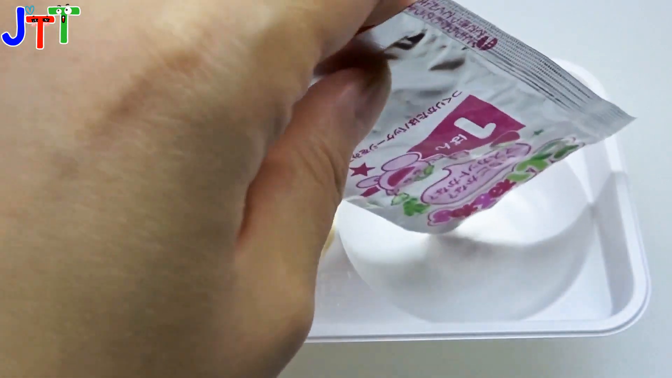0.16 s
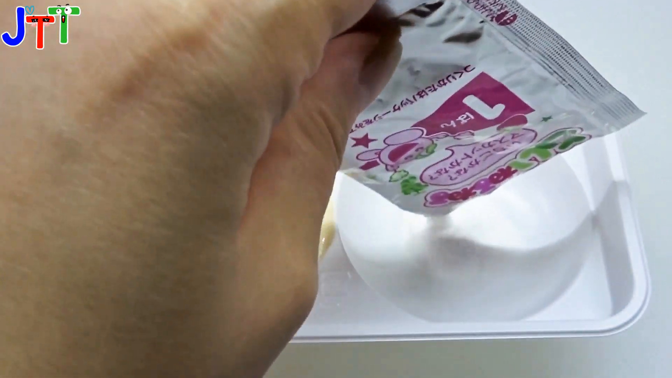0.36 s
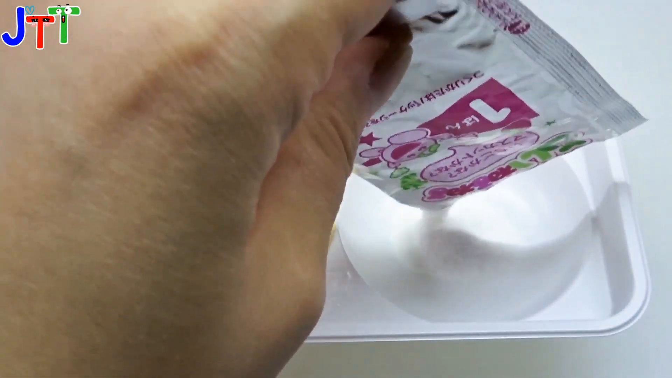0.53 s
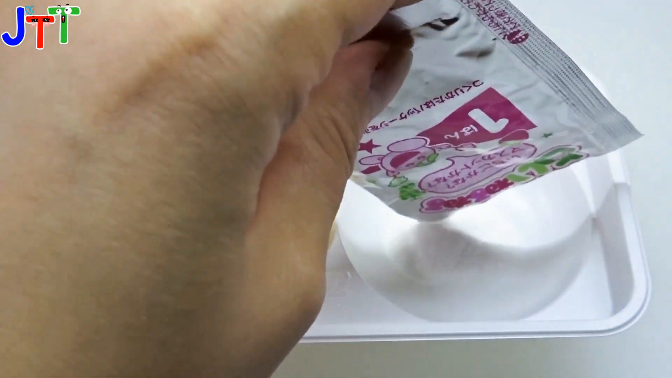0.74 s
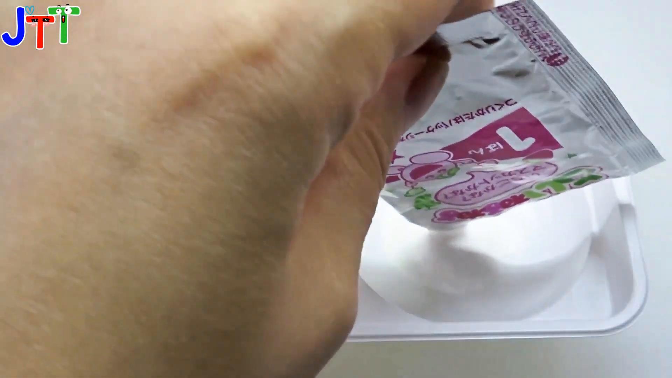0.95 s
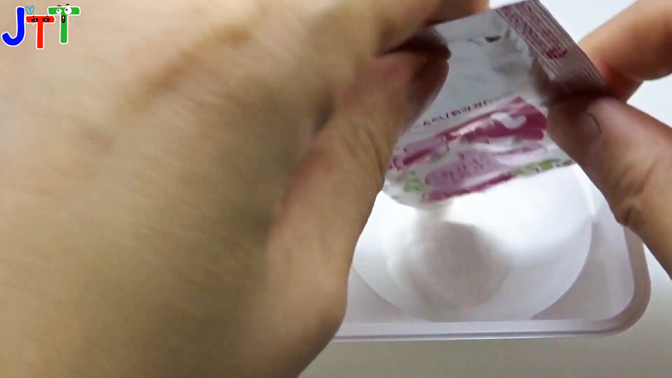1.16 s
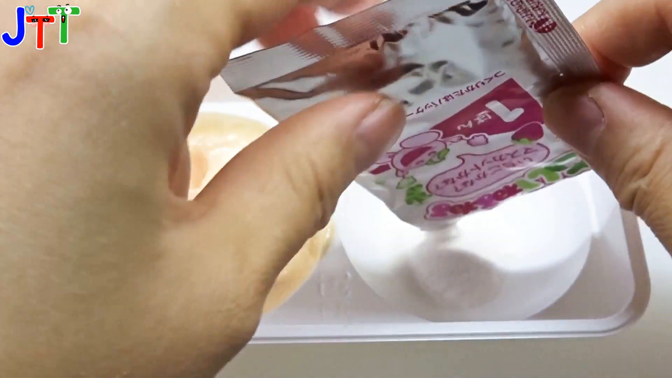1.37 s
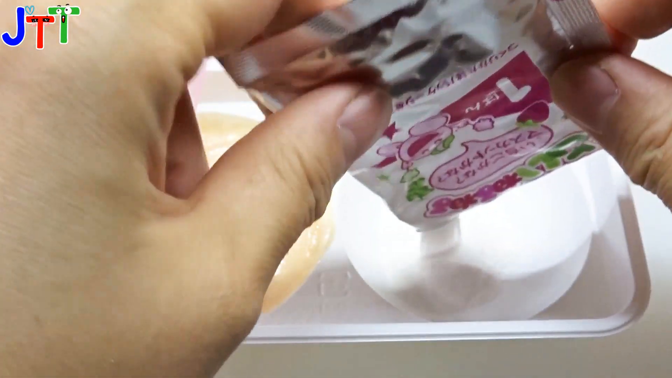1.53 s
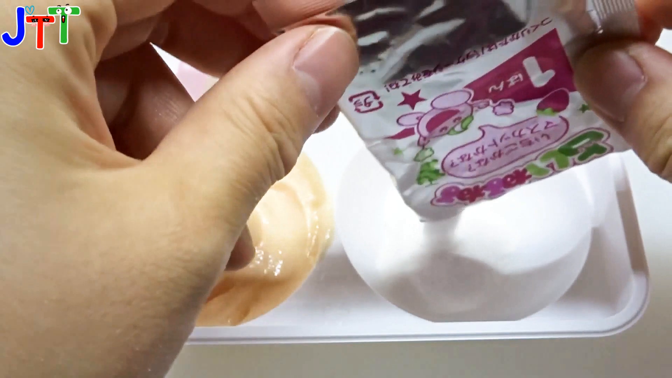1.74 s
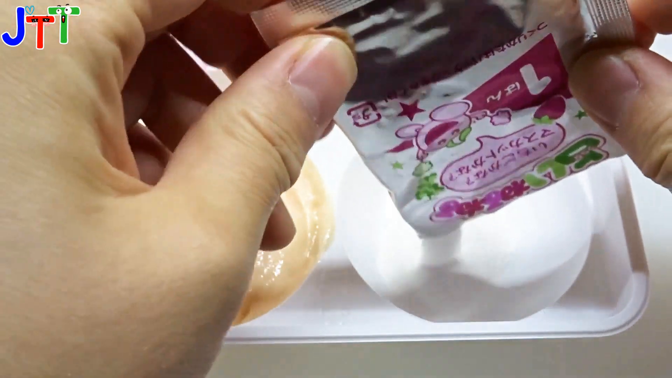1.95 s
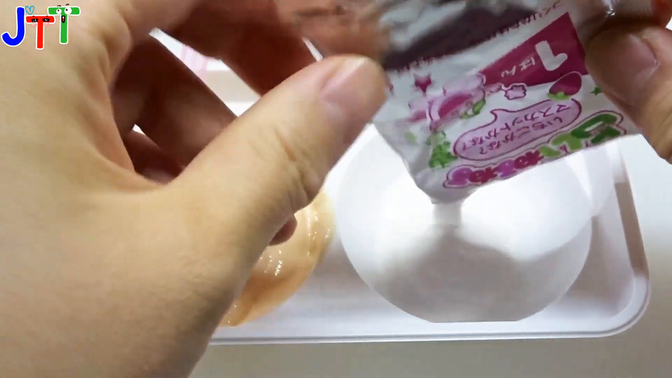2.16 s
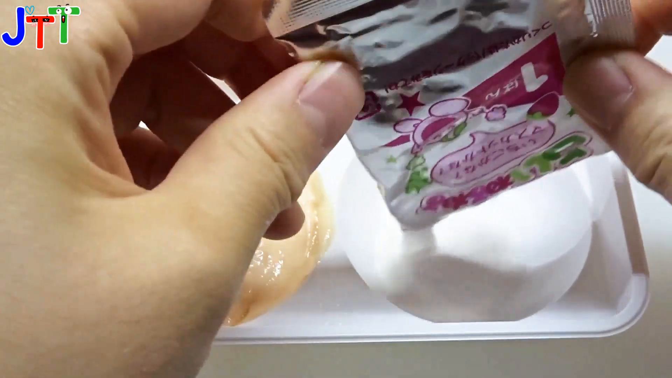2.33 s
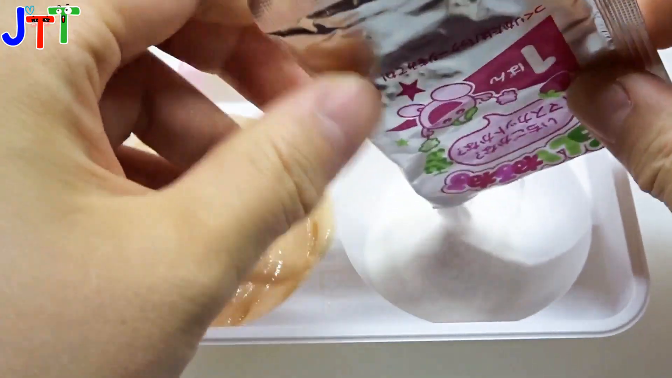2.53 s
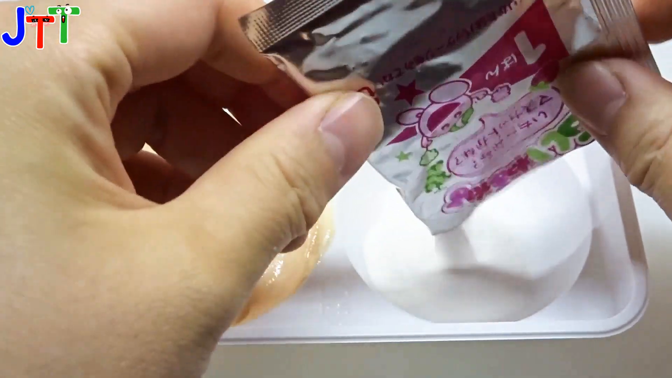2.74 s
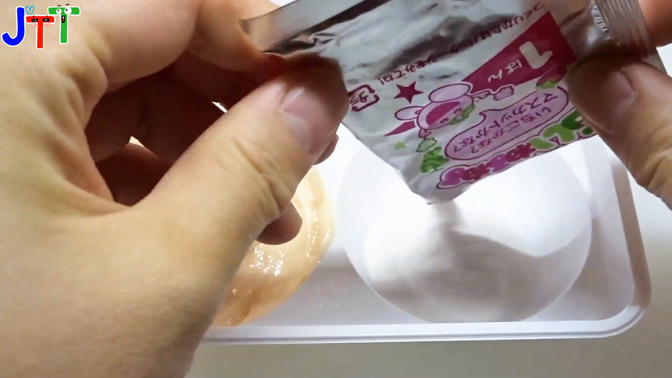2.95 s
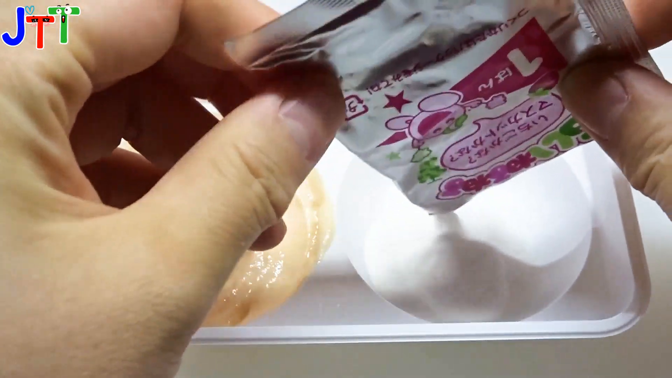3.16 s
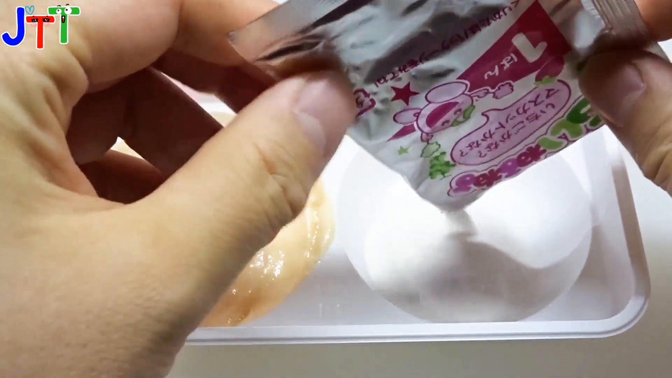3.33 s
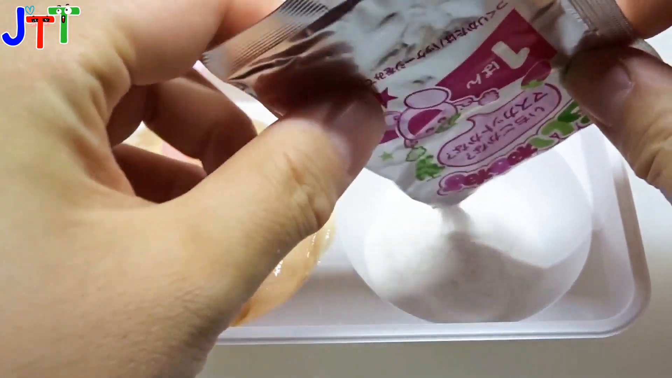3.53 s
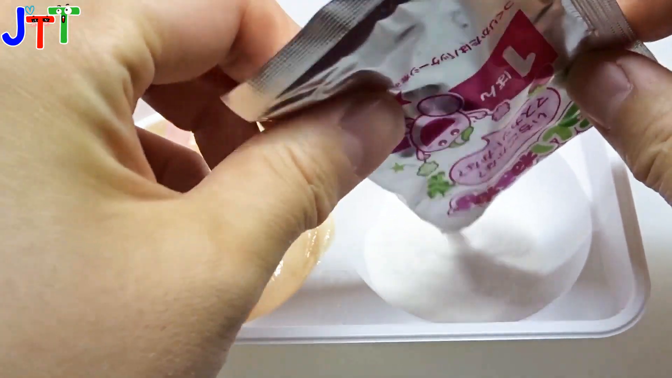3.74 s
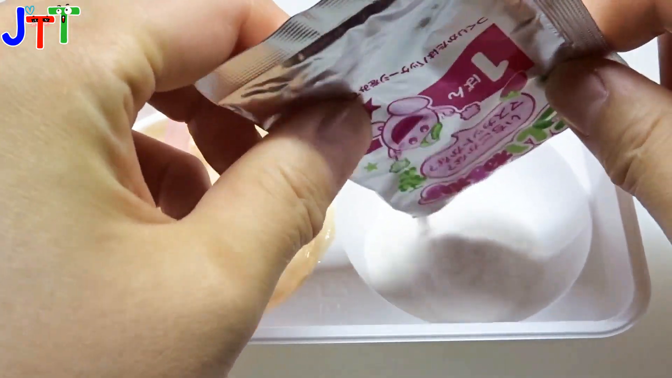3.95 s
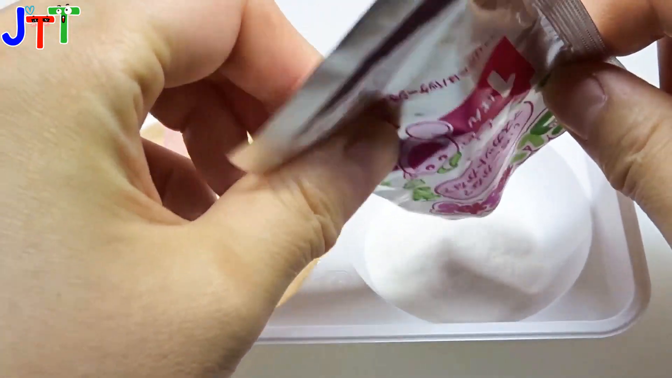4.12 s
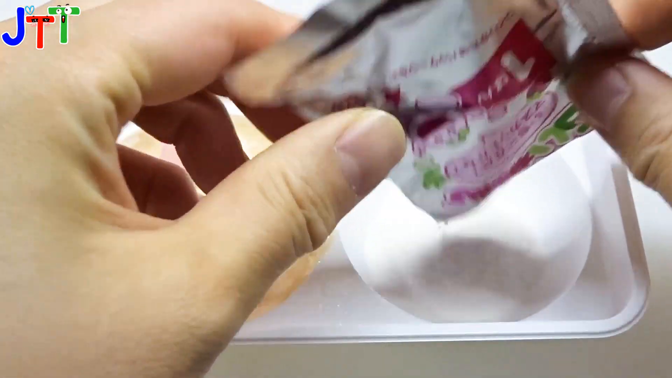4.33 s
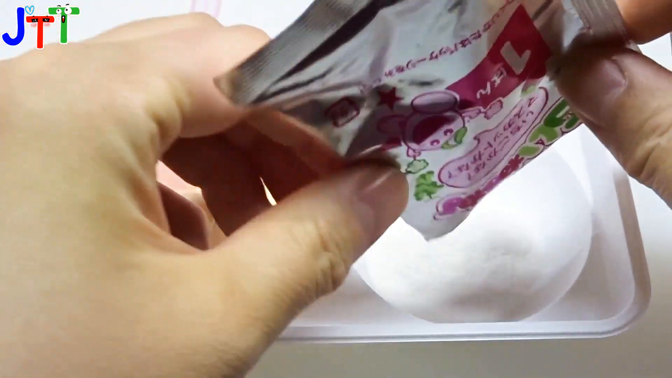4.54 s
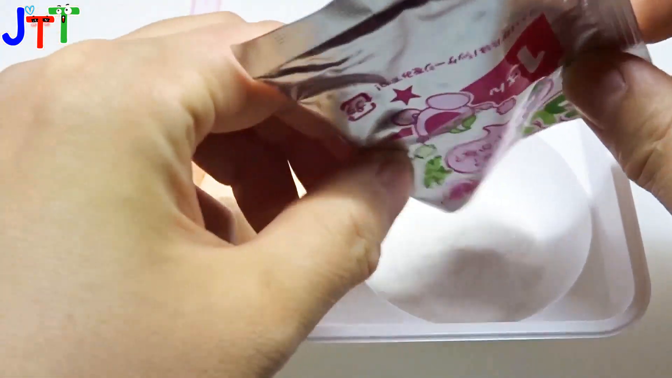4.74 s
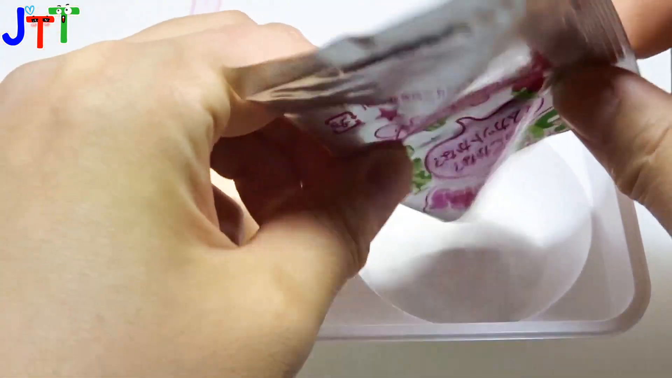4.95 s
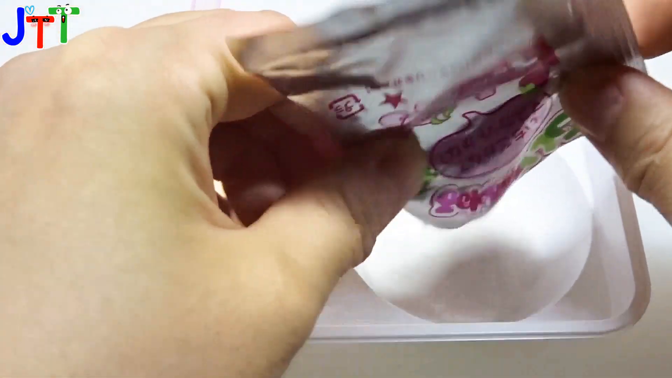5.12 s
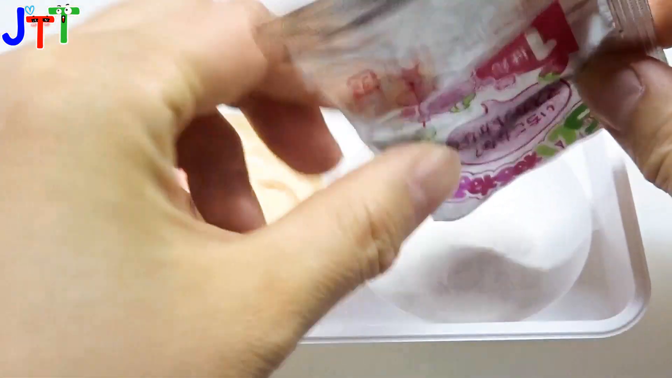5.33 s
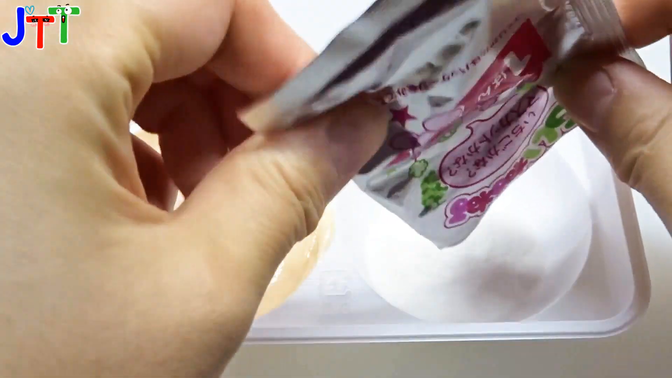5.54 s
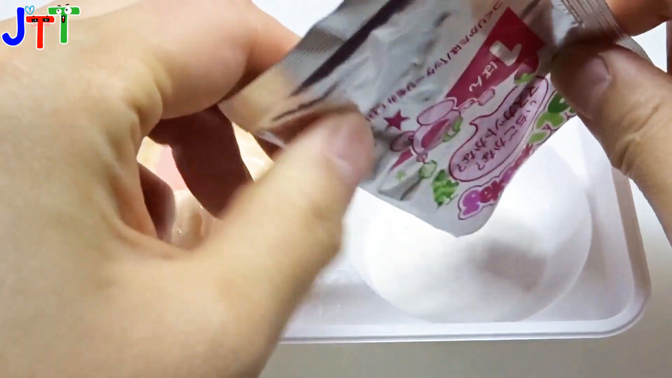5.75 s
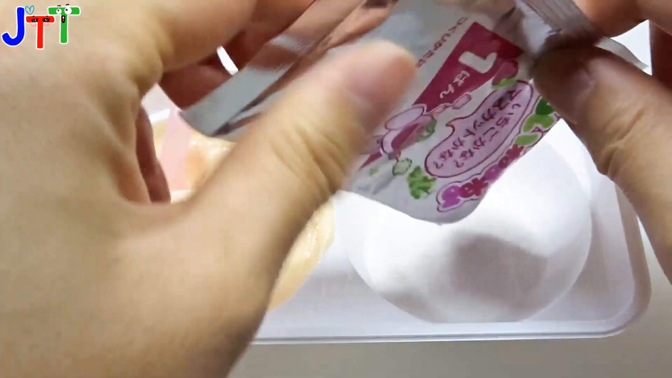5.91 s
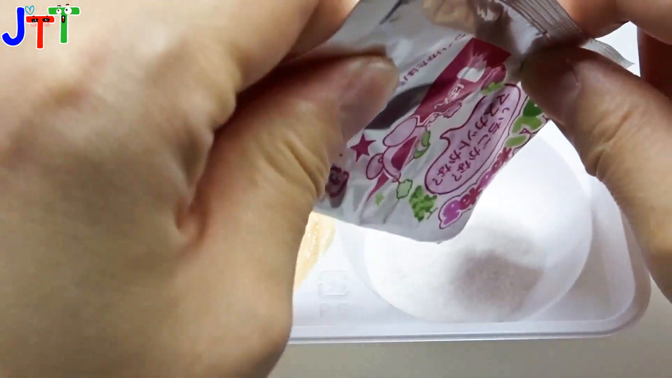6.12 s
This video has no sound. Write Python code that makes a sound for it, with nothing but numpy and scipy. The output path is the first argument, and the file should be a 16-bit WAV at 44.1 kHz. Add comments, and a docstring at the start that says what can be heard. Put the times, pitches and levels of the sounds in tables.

```python
"""Under the whole scene an appliance hums low, with soft air noise, in a quiet room that answers faintly.
First powder slides along a foil packet close to the microphone, a grain-scrape hiss with a fingertip's swish.
A faint tap rings a plastic tray; then fingers squeeze the packet and shake it, and creases buckle in sharp
snaps: noise bursts with short rings, over fine random crackle. Wall panels pop and the pouch resonates.
The snaps crowd together in the later part, while the powder thins out."""
import sys
import numpy as np
from scipy import signal
from scipy.fft import rfft, irfft
from scipy.io import wavfile

SR = 44100
rng = np.random.default_rng(int(sys.argv[2]) if len(sys.argv) > 2 else 0)


def to_wav(sig):
    """Store sig (one row per channel, or 1-D mono) as 16-bit WAV at the path in sys.argv[1].

    Samples outside -1..1 are clipped; the rate is SR.
    """
    pcm = np.clip(np.atleast_2d(sig), -1, 1) * 32767
    pcm = np.round(pcm).astype(np.int16)
    wavfile.write(sys.argv[1], SR, pcm.T)  # frames by channels


N = 276948

# Source levels below are those before the balance gains, the resonators and the microphone.
# clear snaps of buckling creases: (time [s], level [dB], push on the wall relative to the level [dB],
# treble relative to middle band before the treble lift [dB], ring of the facet [Hz])
CREASE_SNAPS = [(0.27, -59.5, 2.5, 0, 4900), (1.061, -38.5, -21, 9.5, 4430), (1.339, -40, -1, 9, 5800),
                (1.3657, -41, -7, -8.0, 3950), (1.3813, -27.5, -18, 6, 3300), (1.389, -36.5, -8, -1, 3980),
                (1.403, -36.5, -22, 8, 4050), (1.892, -38.5, -17, -8, 5700), (1.979, -52.5, -10, -15, 2780),
                (2.102, -44.5, -12, -8, 5500), (2.1671, -35.5, -11.5, -5, 5640),
                (2.192, -38.5, -8, -25, 4100), (2.222, -42, -16, -1, 4200), (2.276, -44, -10, -5, 4140),
                (2.289, -39.5, -11.5, 1, 5430), (2.333, -45, -10, -5, 5200), (2.3903, -46, -6.5, -2, 5100),
                (2.5353, -38, -6, 2, 4030), (2.572, -45, -1, 4, 2700), (2.6277, -37, -0.5, 2, 3200),
                (2.636, -30, -25, 7.5, 5070), (2.65, -38.5, -16, -7, 5400), (2.6884, -45, -1.5, -6, 5360),
                (2.8376, -36, -9, 1, 5250), (2.849, -43, -2, 27, 6500), (2.909, -45.5, -13, 2, 7000),
                (2.9619, -30, -7, 1, 5240), (3.027, -38, -18, -5, 3100), (3.1993, -48, -20, -8, 4020),
                (3.2469, -39, -29, -1, 5550), (3.2638, -40, -2.5, 1, 6040), (3.342, -42.5, -10, 1, 8500),
                (3.35, -49, -9, 2, 5500), (3.398, -39.5, -8.5, 5, 5400), (3.459, -50, -20, -1, 6300),
                (3.5641, -43, -2.5, -4, 7450), (3.583, -36, -6, 0, 2750), (3.5908, -38.5, -7, 2, 4260),
                (3.613, -39, -2, 4, 3260), (3.6274, -42, -16, 6, 2800), (3.7578, -34.5, -5.5, 11, 6100),
                (3.769, -29.5, -10, -1, 6100), (3.7731, -26, -14, 11, 9700), (3.8153, -41.5, -21, -3, 6800),
                (3.849, -33, -4, 6, 4070), (3.8553, -43, -7, -5, 7350), (3.8842, -35, -11, 7, 6940),
                (3.8922, -26, -16.5, -0.5, 7700), (3.9193, -24.5, -18.5, 15, 6600),
                (3.9453, -41, -26, -9, 5100), (3.9807, -25, -38, -2, 6700), (4.0014, -35.5, -1, -13, 6900),
                (4.008, -29, -3.5, 1, 6600), (4.077, -43, 0.5, -2, 4900), (4.1042, -36, -6.5, 10, 4600),
                (4.118, -35.5, -10, 1, 5300), (4.1307, -39.5, -5, -23, 2860),
                (4.1847, -32.5, -3.5, -4, 5700), (4.1933, -32.5, -5, 0, 7800), (4.2035, -31.5, -5, 6, 5900),
                (4.2288, -35, -11, -10, 3180), (4.2459, -29.5, -21, 8, 6200), (4.267, -27.5, -11, 5, 6100),
                (4.273, -32.5, -3, 6, 5100), (4.292, -37.5, -6, -1, 6000), (4.3073, -36, -11, 8, 4740),
                (4.3212, -30.5, -14, -4, 5200), (4.329, -35, -21, 8, 5220), (4.3365, -26.5, -8, 3, 5160),
                (4.3558, -33, -5.5, -2.0, 5100), (4.3987, -33.5, -17, -9, 3650),
                (4.4158, -39, -8, -7, 3880), (4.4369, -28, -10, -2, 6460), (4.445, -28, -22, -14, 3880),
                (4.4484, -25.5, -11.5, -4, 5170), (4.468, -27, -6, -2, 3530), (4.5103, -33, -11, 9, 5960),
                (4.518, -30.5, -11.5, 4, 3600), (4.531, -33.5, -9, -8, 4090), (4.542, -27, -10, 19, 5900),
                (4.549, -35, -3.5, -14, 2980), (4.567, -36, -4.5, -8, 5320), (4.5755, -33, -11, 0.5, 6360),
                (4.661, -43.5, -7, -1, 3160), (4.757, -47.5, -15, -6, 5530),
                (4.7755, -28.5, -10.5, 5, 8200), (4.784, -35.5, -18, 2, 5500), (4.79, -27, -14.5, 11, 7400),
                (4.8222, -35, -8, -18, 5200), (4.84, -21.5, -14.5, 2, 4860), (4.8879, -30.5, -11, 14, 4740),
                (4.903, -29.5, -14.5, 2, 7500), (4.914, -35, -9.5, 16, 7500), (4.9203, -35, -13, -9, 6100),
                (4.936, -45, -12, -7, 5500), (4.949, -49, -14, -6, 4000), (4.976, -38, -30, 1, 6300),
                (5.009, -45.5, -12, 1, 6000), (5.019, -35.5, -7.5, -3, 3900),
                (5.1155, -37.5, -9.5, 10, 8400), (5.146, -27.5, -8, 2, 6700),
                (5.156, -33.5, -8, -9.0, 6300), (5.164, -38, -10, -6, 4500),
                (5.1763, -23.5, -3.5, -4, 4900), (5.196, -31, -7.5, -2, 4750), (5.349, -32, 0, -9, 5100),
                (5.3604, -23, -16, 7, 5080), (5.3661, -21.5, -14.5, 10, 5100),
                (5.4868, -37, -6.5, -5, 2300), (5.5121, -26.5, -16, 11, 7700),
                (5.5265, -31.5, -26, 18, 7800), (5.5362, -33, -14, 12, 5200), (5.5413, -33, -13, 13, 6400),
                (5.554, -37, -2.5, -4, 2380), (5.6371, -23.5, -13, 5.5, 5760),
                (5.6786, -30.5, -10, 13, 7260), (5.6944, -37.5, -4, 2, 4400), (5.7234, -36, -1, -18, 2260),
                (5.731, -31.5, -4, 12, 5300), (5.7444, -45, -5, -2, 6350), (5.7682, -29.5, -24, -6, 6950),
                (5.8414, -29.5, -10, -13, 5470), (5.8537, -35.5, -7, -25, 3550), (5.871, -34, -7, -7, 5440),
                (5.9132, -24.5, -23, 0.5, 4000), (5.9263, -33.5, -11, 4, 5630),
                (5.959, -34, -10.5, 1, 5230), (5.986, -43.5, 3.5, 5, 2200), (6.1488, -29, -27, 9, 5530),
                (6.1567, -28, -21, 1.5, 5450), (6.1737, -36, -12, -3, 5600), (6.191, -37.5, -5.5, 0, 6630),
                (6.202, -46.5, -3, 1.5, 6000), (6.222, -29.5, -9, -3, 2200), (6.233, -26, -15, 8, 2120),
                (6.2597, -31, -16, 5, 6000), (6.2692, -27.5, -7, -1, 5570)]
# wall panels flipping over: (time [s], peak level [dB], pitch the panel settles at [Hz])
PANEL_POPS = [(1.3807, -34, 1370), (1.403, -28.5, 4030), (2.6277, -35.5, 392), (2.9625, -35, 1420),
              (3.1473, -38.5, 433), (4.0105, -35, 440), (4.272, -36, 330), (4.336, -29, 986),
              (4.4631, -25.5, 930), (4.8395, -26, 970), (5.02, -34, 573), (5.1769, -25, 1200),
              (5.359, -28, 1050), (5.985, -36.5, 420), (6.2235, -35, 1030)]
# squeezes of the fingers: (time at the tightest [s], crackle level [dB], time to build [s],
# wall rustle relative to the crackle [dB])
SQUEEZES = [(1.385, -52.5, 0.075, -8), (1.897, -48, 0.018, -14), (2.22, -62.5, 0.23, 2.5),
            (2.64, -51, 0.047, -8), (3.041, -43.5, 0.025, -8.5), (3.29, -58, 0.14, -3.5),
            (3.605, -48.5, 0.043, -4), (3.773, -42.5, 0.019, -4), (3.891, -46, 0.014, -1.5),
            (4.015, -50, 0.013, 5), (4.117, -47, 0.046, -18), (4.2, -42, 0.014, -15),
            (4.328, -45.5, 0.065, -6.5), (4.458, -55, 0.035, 1), (4.544, -43, 0.052, -10.5),
            (4.79, -53.5, 0.03, 4.5), (4.913, -45.5, 0.048, -7.5), (5.03, -58.5, 0.03, 4),
            (5.181, -38, 0.04, -8), (5.356, -37, 0.028, -6.5), (5.537, -42, 0.032, -1.5),
            (5.63, -46, 0.043, -1), (5.747, -45.5, 0.028, -11.5), (5.92, -38.5, 0.024, -11),
            (6.167, -44, 0.02, -2), (6.27, -44, 0.031, -21)]
# steady grip of both hands between squeezes: (time [s], crackle level [dB])
GRIP = [(1.75, -90), (2.05, -81), (2.55, -60.5), (3.5, -64.5), (4.35, -60), (4.7, -74), (5.05, -59.5),
        (5.44, -73), (6.05, -64.5), (6.28, -70)]
# spectrum of the fine crackle: (frequency [Hz], relative density [dB per Hz])
CRACKLE_COLOUR = [(900, -21.5), (1700, -1), (2600, 9), (4000, 3.5), (6000, 9), (9000, 3.5), (12000, -0.5),
                  (16000, -7)]
# resonances of the hollow pouch: (frequency [Hz], width [Hz], level [dB])
POUCH_MODES = [(417, 253, -3), (1020, 71, 5.5), (1745, 110, -1), (3963, 74, 0), (5120, 154, -2),
               (6250, 280, -10.5)]
# powder trickling down the foil, thinning as the packet empties: (time [s], level [dB])
TRICKLE = [(0, -54.5), (.25, -50.5), (.53, -50), (.68, -48), (1.45, -48.5), (1.6, -57), (1.78, -50),
           (2.02, -59), (2.28, -59), (2.45, -54), (3.05, -52), (3.35, -50), (3.52, -65), (6.28, -71)]
# clumps of powder that let go at once: (time [s], level [dB])
SPILLS = [(.257, -45), (.439, -42.5), (1.9, -46), (2.39, -45)]
# spectrum of the sliding powder: (frequency [Hz], relative density [dB per Hz])
SLIDE_COLOUR = [(600, -18), (1300, -11), (2400, -20.5), (3600, -11.5), (4800, -3.5), (6200, 1), (7000, -6),
                (7600, -2), (8300, -2.5), (8900, 1.5), (9800, -2.5), (11500, -2), (13500, -2.5), (16000, 0)]
# skin gliding on the foil: (start [s], end [s], level [dB], mean pitch of the swish [Hz])
GLIDES = [(0.052, 0.608, -63.5, 4850), (1.655, 2.38, -64.5, 5340), (5.337, 5.392, -29.5, 5120),
          (5.573, 5.653, -43.5, 5200), (6.012, 6.142, -54, 5430)]
# resonances of a glide: (multiple of its pitch [1], width [Hz], level [dB])
SWISH_MODES = [(1, 520, 5), (1.15, 650, -1), (1.4, 700, -3), (1.61, 700, -5.5), (1.85, 700, -12)]
# gains of the snaps' treble and of the sliding sounds: left, then right [1]
LEFTWARD = np.array([[1.08], [0.92]])
# light taps on the plastic tray: (time [s], level [dB])
TRAY_TAPS = [(0.842, -50)]
# modes of the tray: (frequency [Hz], level [dB], time to fall 60 dB [s])
TRAY_MODES = [(720, -2.2, 0.064), (1296, 0, 0.067), (1190, 1.5, 0.027)]
# decay of the room: (frequency [Hz], time to fall 60 dB [s])
ROOM_T60 = [(300, 0.054), (800, 0.19), (2000, 0.19), (5500, 0.1), (14000, 0.12)]
# spectrum of the room's air noise: (frequency [Hz], relative density [dB per Hz])
ROOM_COLOUR = [(20, -15), (50, -23), (90, -16), (130, -9), (200, -3), (260, -0.5), (400, -4.5), (600, -9.5),
               (900, -13.5), (1400, -15.5), (2000, -21), (6000, -24), (12000, -23.5), (16000, -25)]
# lines of the appliance's hum: (frequency [Hz], mean rms level [dB])
HUM_LINES = [(253.6, -60), (240, -65), (334.4, -68), (186, -83.5)]
# response of the microphone: (frequency [Hz], gain [dB])
MIC_RESPONSE = [(100, 1), (350, 0.5), (580, -1), (780, -5), (1100, -3), (1500, -2), (1800, -0.5), (2500, 0),
                (3300, 3), (5500, -2.5), (8000, -0.5), (11500, -0.5), (13500, -6.5), (16000, -18.5)]

EDGE_HZ = 16000  # upper band limit
LET_GO = 0.73  # time to relax, as a share of the time to build
SQUEEZE_SHAPE = 1.34  # 1 is a pointed swell, 2 a rounded one that ends sooner
GRIP_WALL_DB = -3  # wall rustle under a steady grip, relative to the crackle
SPILL_S = 0.036  # time for a spill to gather
# a harder push moves a wider, lower panel; the scatter is in octaves
PANEL_HZ, PANEL_DB_PER_OCTAVE, PANEL_SCATTER = 654, 12, 0.46
FACET_LO_HZ, FACET_HI_HZ = 2720, 8000  # range of the facet rings of lesser creases


def snap(level_db, wall_db, bright_db, facet_hz, crack=5.4, crack_scatter_db=4.0, rise_s=0.00022,
         flutter_s=0.0021, linger=0.14, linger_s=0.0043, wall_s=0.0048, facet=1.43, panel=0.82,
         thump_db=-20.0, shape=1.18, neighbour=0.84, size=2048):
    """Buckling: a crease releases strain as one crack, a few ms of foil flutter and a duller wall push."""
    t = np.arange(size) / SR
    # the flutter dies fast near the crease and lingers a little in the rest of the sheet
    near_s = flutter_s * 2 ** rng.uniform(-0.51, 0.75)
    decay = np.exp(-(t / near_s) ** shape) + linger * np.exp(-t / linger_s)
    # the buckle takes a moment to run along the crease
    flutter = rng.standard_normal((2, size)) * decay * (1 - np.exp(-t / rise_s))

    # a crease that hardly moves the wall spends more of its strain in the first crack
    crack_db = -.3 * (wall_db + 12.5) + crack_scatter_db * rng.uniform(-1.05, 1)
    flutter[0, 0] += crack * gain_of(crack_db) * rng.choice([-1, 1])

    # each small facet and each wide panel of foil has its own size, and so its own short ring
    flutter[0] += facet * ringing(flutter[0], facet_hz, 6)
    neighbour_hz = min(facet_hz * 2 ** rng.uniform(-0.84, 1), EDGE_HZ)
    flutter = flutter + neighbour * ringing(flutter, neighbour_hz, 7)

    push = rng.standard_normal((2, size)) * np.exp(-t / wall_s)
    octaves = PANEL_SCATTER * rng.uniform(-1.08, 1) - min(wall_db, 2) / PANEL_DB_PER_OCTAVE
    push = push + panel * ringing(push, min(PANEL_HZ * 2 ** octaves, 2500), 8)

    treble_share = 1 / (1 + gain_of(-bright_db) ** 2)  # share of the power
    clack = evened(spread(band(flutter, 1540, 6930), 0.4)) * np.sqrt(1 - treble_share)
    tick = evened(spread(band(flutter, 5500, 14500, order=3), 1.0)) * np.sqrt(treble_share)
    tick = tick * gain_of(1.33) * LEFTWARD  # treble lift
    thump = gain_of(thump_db) * evened(band(push[0], 24, 250, order=1))
    wall = evened(spread(band(push, 344, 1710), 0.018)) + thump
    sound = clack - tick + gain_of(wall_db) * wall
    return gain_of(level_db) * sound * np.sqrt(0.0043 * SR / size)  # level referred to about 4 ms


def creases(follow_db=-18.0, follow_s=.016, scatter_db=3.0, duller_db=17.0, count=2):
    """Strain transfer: every clear snap sets off smaller ones in the neighbouring creases."""
    out = np.zeros((2, N))
    for s, level_db, wall_db, bright_db, facet_hz in CREASE_SNAPS:
        add(out, s, snap(level_db, wall_db, bright_db, facet_hz))
        for _ in range(count):
            delay, (size, shine) = rng.random(), rng.standard_normal(2)
            # the later a neighbour gives way, the less strain is left in it
            weaker_db = follow_db - 5 * delay + scatter_db * size
            follower = snap(level_db + weaker_db, wall_db, bright_db - duller_db + 4 * shine,
                            rng.uniform(FACET_LO_HZ, FACET_HI_HZ))
            add(out, s + follow_s * delay, follower)
    return out


def pops(peak_s=0.001, sag=0.29, size=1024):
    """Falling tension: a wall panel flips and swings for a few cycles, its pitch dropping."""
    t, out = np.arange(size) / SR, np.zeros((2, N))
    swing = t / peak_s * np.exp(1 - t / peak_s)
    for s, db, hz in PANEL_POPS:
        cycles = np.cumsum(hz * (1 + sag * np.exp(-t / peak_s))) / SR
        add(out, s, gain_of(db) * swing * np.sin(2 * np.pi * cycles))
    return out


def flexing():
    """Applied strain: the fingers' work on the foil, as gains of fine crackle and wall rustle."""
    fine = level(GRIP, axis=1)
    wall = fine * gain_of(GRIP_WALL_DB)
    for s, db, build_s, wall_db in SQUEEZES:
        squeeze = swell(s, db, build_s, LET_GO, SQUEEZE_SHAPE)
        fine = np.maximum(fine, squeeze)
        wall = np.maximum(wall, squeeze * gain_of(wall_db))
    return fine, wall


def crackle(strain, rustle, per_s=700, ring_s=0.0022, fine_db=2.5, wall_db=1.0, rub=0.62, size=512):
    """Crackling noise: tiny creases give way at random in the flexing foil; skin rubs on it underneath."""
    t, clicks = np.arange(size) / SR, np.zeros((2, N))
    for _ in range(20):  # twenty kinds of facet share the clicks
        facet = rng.standard_normal((2, size)) * np.exp(-t / ring_s)
        clicks += signal.oaconvolve(grains(per_s / 20, 6.9)[None], facet, axes=1)[:, :N]
    drive = evened(clicks) + rub * rng.standard_normal((2, N))
    fine = evened(coloured(spread(drive, 0.44), CRACKLE_COLOUR)) * strain
    wall = evened(band(spread(drive, 0.018), 243, 1130)) * rustle
    return gain_of(fine_db) * fine + gain_of(wall_db) * wall


def small_creases(strain, per_s=40, above_db=5.0, ceiling_db=-46.0, scatter_db=3.0, wall_db=-7.5,
                  bright_db=6.5):
    """Random buckling: lesser creases flip in the held packet, louder with strain up to a ceiling."""
    out, slots = np.zeros((2, N)), np.arange(GRIP[0][0], N / SR, 1 / per_s)
    for s in slots + rng.random(len(slots)) / per_s:
        strain_db = 20 * np.log10(strain[min(int(s * SR), N - 1)] + 1e-9)
        level_db = min(strain_db + above_db, ceiling_db)
        size, push, shine = rng.standard_normal(3)
        flip = snap(level_db + scatter_db * size, wall_db + 4 * push, bright_db + 5 * shine,
                    rng.uniform(FACET_LO_HZ, FACET_HI_HZ))
        add(out, s, flip)
    return out


def pouch(x, give=0.017, give_per_s=5.6):
    """Resonance: the hollow packet rings in modes that shift a little as the fingers change its shape."""
    stretched_t, out = np.cumsum(1 + give * drift(give_per_s)) / SR, x
    for hz, width, db in POUCH_MODES:
        # shift the mode down to 0 Hz, low-pass there, and shift it back
        turn, r = np.exp(2j * np.pi * hz * stretched_t), np.exp(-np.pi * width / SR)
        slow = signal.lfilter([1 - r], [1, -r], x * turn.conj())
        out = out + gain_of(db) * 2 * (turn * slow).real
    return out


def powder(per_s=9000, uneven_db=1.0):
    """Superposed impacts: thousands of grains a second scrape down the foil and merge into a hiss."""
    hiss = spread([grains(per_s, 1.9), grains(per_s, 2.3)], 0.58)
    spills = sum(swell(s, db, SPILL_S) for s, db in SPILLS)
    flow = np.hypot(level(TRICKLE, axis=1), spills)
    return evened(coloured(hiss, SLIDE_COLOUR)) * flow * gain_of(uneven_db * drift(19))


def glides(judder=0.36, wander=0.015, wander_per_s=4.6, fade_s=0.04):
    """Sliding friction: a fingertip excites a few high resonances that shift as it travels the foil."""
    out = np.zeros((2, N))
    for start, end, db, hz in GLIDES:
        length = max(round((end - start) * SR), 64)
        friction = spread(rng.standard_normal((2, N)), 0.4) * (1 + judder * drift(90))
        friction = friction[:, :length]
        bend = 2 * np.pi * np.cumsum(hz * wander * drift(wander_per_s)[:length]) / SR
        swish = np.zeros((2, length))
        for k, width, mode_db in SWISH_MODES:
            mode = signal.hilbert(band(friction, hz * k - width / 2, hz * k + width / 2))
            swish += gain_of(mode_db) * (mode * np.exp(1j * k * bend)).real
        t = np.arange(length) / SR
        contact = np.minimum(np.minimum(t, t[::-1]) / fade_s, 1)
        add(out, start, gain_of(db) * evened(swish) * contact)
    return out


def nearby(x, strength=0.1, reach_s=0.0032, move_per_s=3.7, count=8):
    """Comb filtering: single reflections off hands and tray vary in strength as the hands move."""
    delays = (reach_s * SR * rng.uniform(0.12, 1, count)).astype(int)
    echoes = sum(drift(move_per_s) * np.pad(x, ((0, 0), (d, 0)))[:, :N] for d in delays)
    return x + strength * echoes


def tray():
    """Modal decay: a light touch rings the plastic tray as a sum of dying sines."""
    t, out = np.arange(SR // 4) / SR, np.zeros((2, N))
    ring = sum(gain_of(db - 60 * t / t60) * np.sin(2 * np.pi * hz * t) for hz, db, t60 in TRAY_MODES)
    for s, db in TRAY_TAPS:
        add(out, s, gain_of(db) * ring)
    return out


def room(x, wet_db=-12.5, side=0.41):
    """Reverberation: a faint diffuse tail builds over 3 ms and decays at a rate set by frequency."""
    t = np.arange(SR // 2) / SR
    noise = spread(rng.standard_normal((2, len(t))), side)
    hz, when, cells = signal.stft(noise, SR, nperseg=256)
    decay = gain_of(-60 * when / read(ROOM_T60, hz)[:, None])
    tail = signal.istft(cells * decay, SR, nperseg=256)[1][:, :len(t)]
    tail = evened(tail * np.minimum(t / 0.003, 1)) / np.sqrt(len(t))
    return x + gain_of(wet_db) * signal.oaconvolve(x, tail, axes=1)[:, :N]


def background(air_db=-57.5, waver=0.1, wander=0.49):
    """Tones in noise: wavering hum lines over soft air noise whose bass is nearly the same on both sides."""
    t, hum = np.arange(N) / SR, np.zeros(N)
    for hz, db in HUM_LINES:
        swing = np.sqrt(2) * (1 + waver * drift(3.6))
        hum += gain_of(db) * swing * np.sin(2 * np.pi * hz * t + wander * drift(5.3))
    shared, apart = rng.standard_normal((2, N))
    apart = coloured(apart[None], [(50, -11), (250, -18), (600, -4.0), (1400, 1), (8000, 1.5)])[0]
    return hum + gain_of(air_db) * evened(coloured(spread([shared, apart], 0.98), ROOM_COLOUR))


def gain_of(db):
    """Level: decibels to an amplitude factor."""
    return 10 ** (np.asarray(db) / 20)


def evened(x):
    """Normalization: scales to rms 1."""
    return x / np.sqrt(np.mean(x ** 2) + 1e-20)


def read(points, hz):
    """Interpolation: reads a spectrum on a log-frequency axis."""
    f, value = np.transpose(points)
    return np.interp(np.log(hz + 1), np.log(f + 1), value)


def level(rows, axis):
    """Envelope: one dB column as a gain for every sample, -100 dB outside the curve."""
    rows = np.asarray(rows)
    return gain_of(np.interp(np.arange(N) / SR, rows[:, 0], rows[:, axis], left=-100, right=-100))


def swell(s, db, build_s, release=1, shape=1):
    """Envelope: a gain that grows up to time s and dies away after it."""
    t = np.arange(N) / SR - s
    distance = np.minimum(np.maximum(-t, t / release) / build_s, 10)
    return gain_of(db) * np.exp(-distance ** shape)


def add(mix, s, sound):
    """Superposition: mixes a sound into both channels at time s."""
    part = mix[:, max(round(s * SR), 0):][:, :sound.shape[-1]]
    part += sound[..., :part.shape[-1]]


def band(x, lo_hz, hi_hz, order=2):
    """Filtering: a causal band-pass."""
    return signal.lfilter(*signal.butter(order, [lo_hz, min(hi_hz, SR / 2 - 1)], "band", fs=SR), x)


def ringing(x, hz, q):
    """Resonance: the response of a single mode of quality factor q."""
    return signal.lfilter(*signal.iirpeak(hz, q, fs=SR), x)


def coloured(x, points, size=4096):
    """Minimum phase: a causal filter with the given spectrum, so that attacks stay sharp."""
    log_gain = np.log(gain_of(read(points, abs(np.fft.fftfreq(size, 1 / SR)))))
    taps = np.fft.ifft(np.exp(np.conj(signal.hilbert(log_gain)))).real[:size // 2]
    return signal.oaconvolve(x, taps[None], axes=1)[:, :N]


def spread(pair, side):
    """Stereo sum and difference: a shared and a differing signal become left and right."""
    return np.array([pair[0] + side * pair[1], pair[0] - side * pair[1]]) / np.hypot(1, side)


def drift(per_s):
    """Random modulation: low-passed noise of rms 1."""
    smooth = np.exp(-(np.fft.rfftfreq(N, 1 / SR) / per_s) ** 2)
    return evened(irfft(rfft(rng.standard_normal(N)) * smooth, N))


def grains(per_s, range_db):
    """Random impulses: sparse clicks of random sign, most of them small and a few large."""
    size = gain_of(range_db * np.minimum(rng.exponential(1, N), 4))
    return size * rng.choice([-1, 1], N) * (rng.random(N) < per_s / SR)


def scene():
    """Superposition: foil and tray in the room, the sliding sounds slightly left, and the background."""
    strain, rustle = flexing()
    buckling = creases() + pops() + crackle(strain, rustle) + small_creases(strain)
    foil = gain_of(-1.58) * pouch(buckling)
    sliding = gain_of(-2.1) * nearby(powder()) + glides()
    return room(foil + tray()) + sliding * LEFTWARD + background()


def record(dry):
    """Transduction: the microphone's colour, then the band limit."""
    low_pass = signal.firwin(255, EDGE_HZ, window=("kaiser", 9), fs=SR)
    return signal.oaconvolve(coloured(dry, MIC_RESPONSE), low_pass[None], "same")


dry = scene()
out = record(dry)
to_wav(out)
```